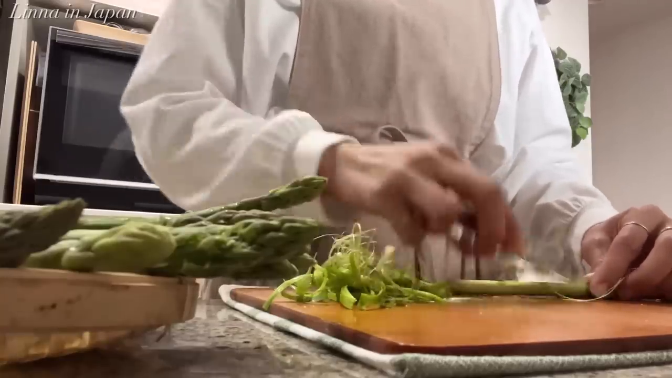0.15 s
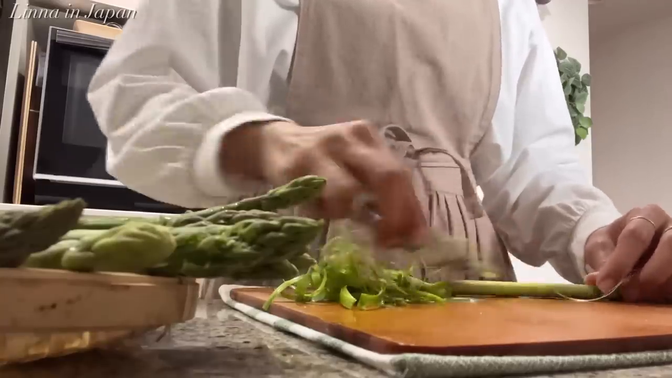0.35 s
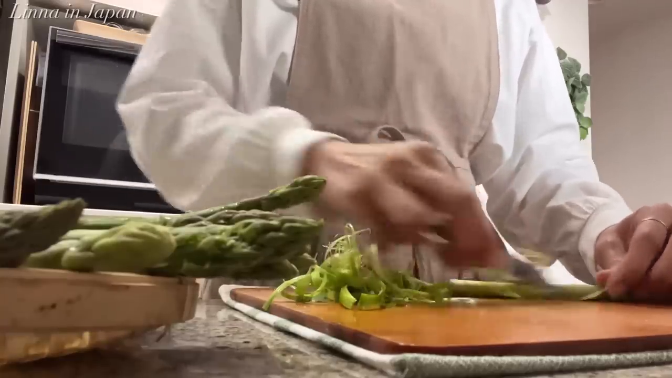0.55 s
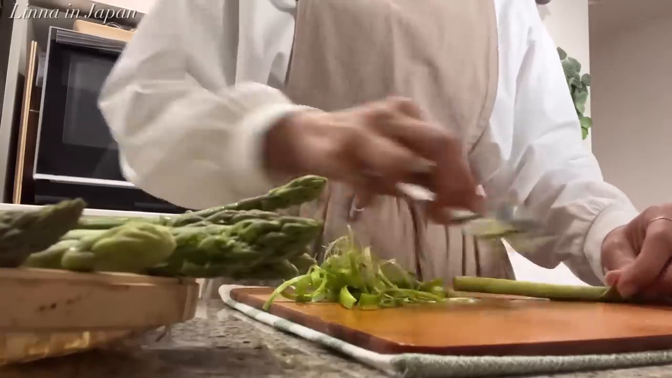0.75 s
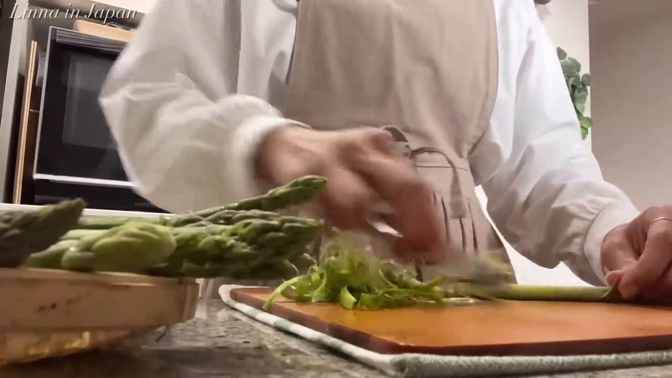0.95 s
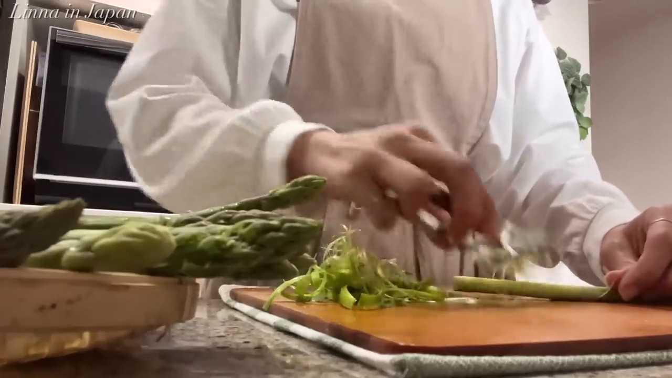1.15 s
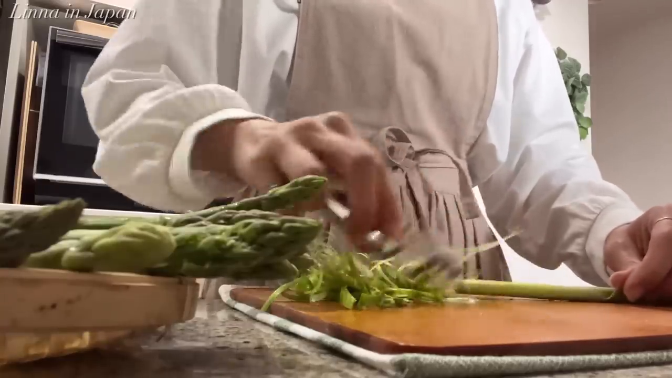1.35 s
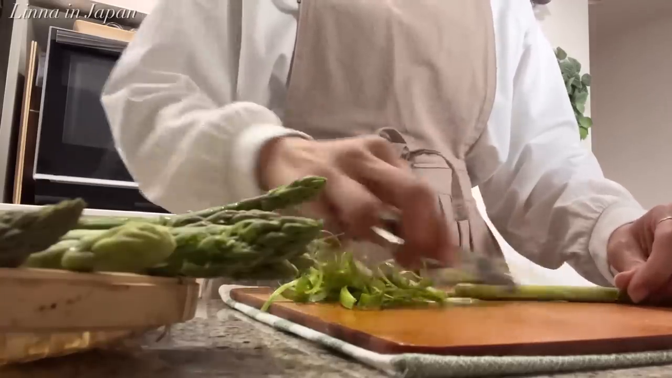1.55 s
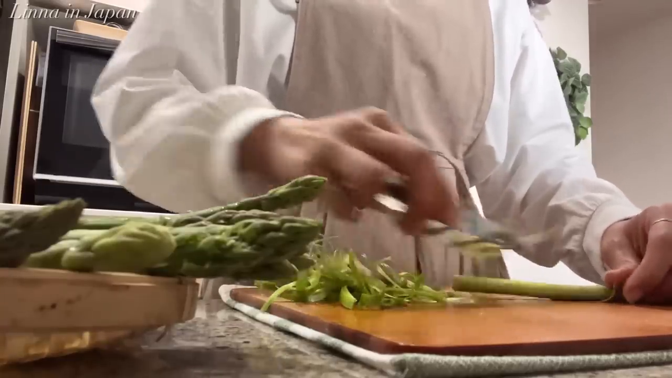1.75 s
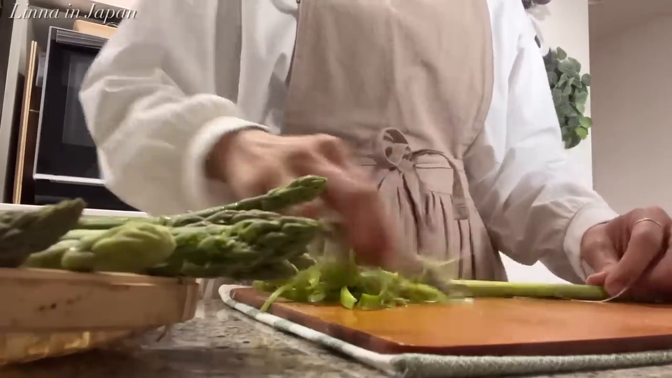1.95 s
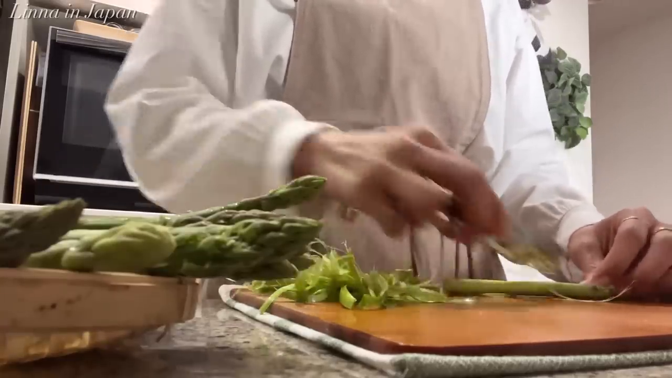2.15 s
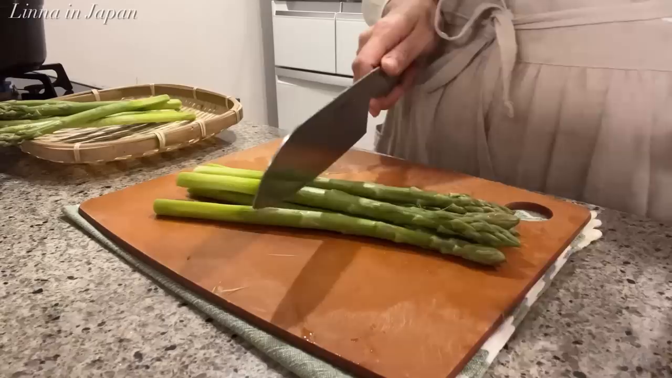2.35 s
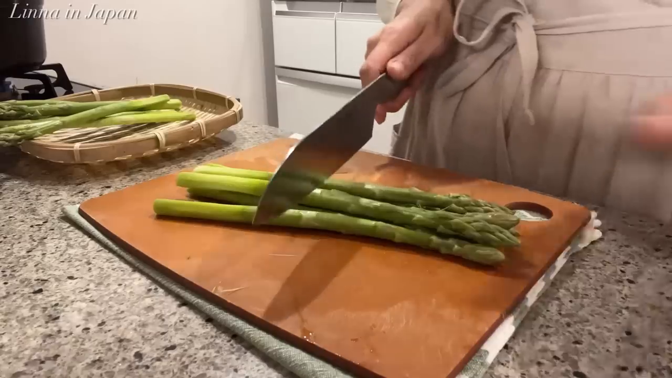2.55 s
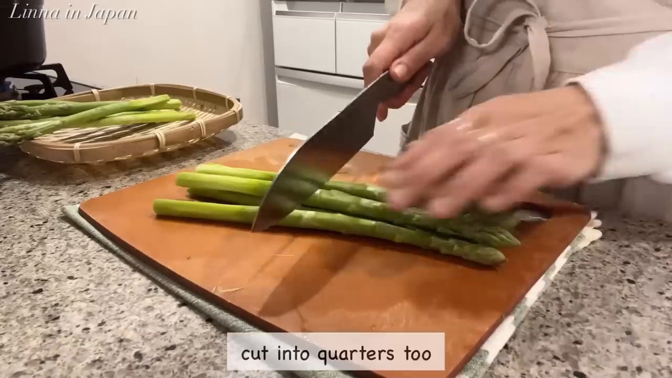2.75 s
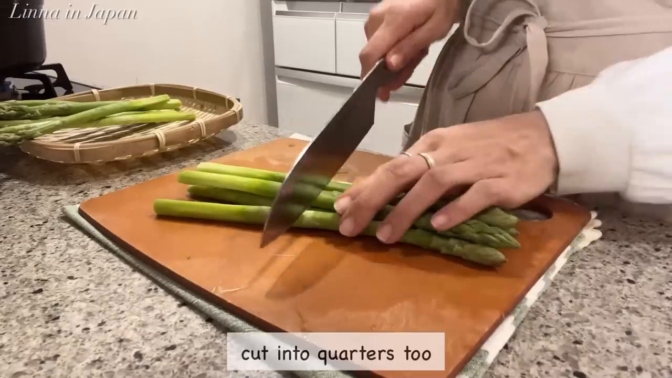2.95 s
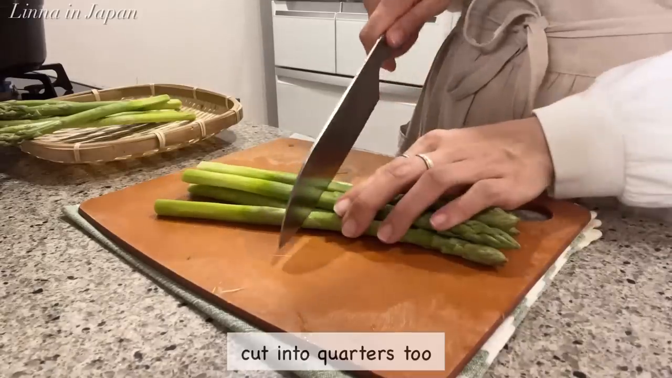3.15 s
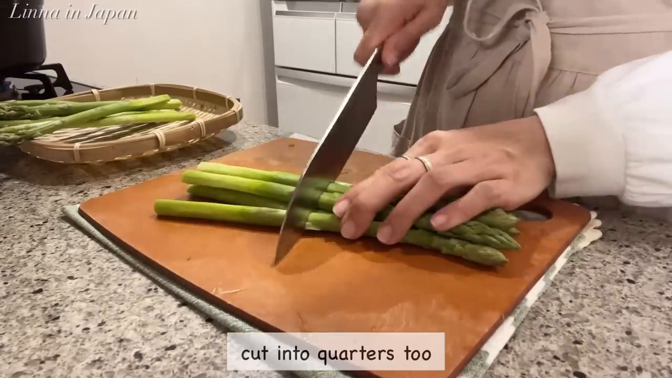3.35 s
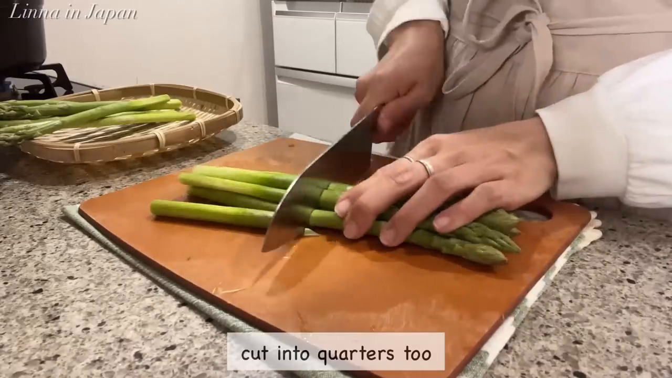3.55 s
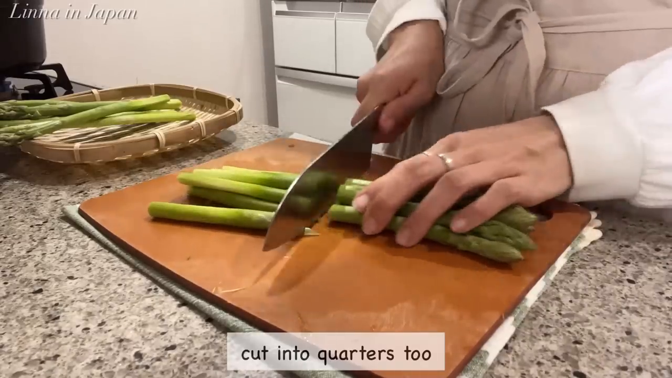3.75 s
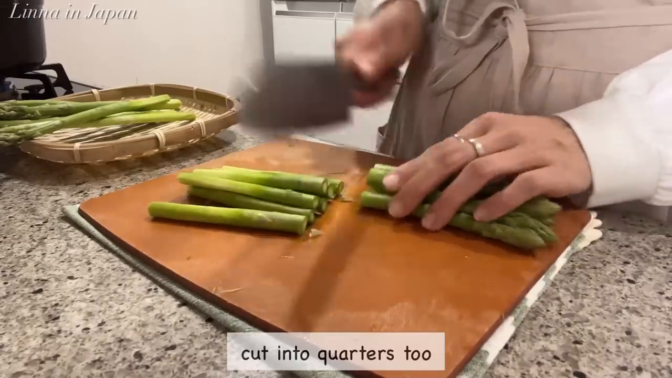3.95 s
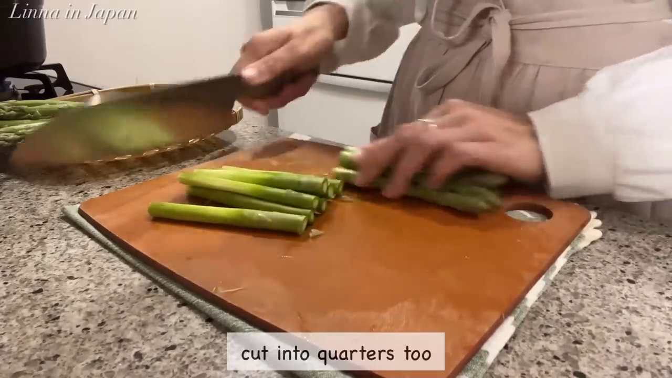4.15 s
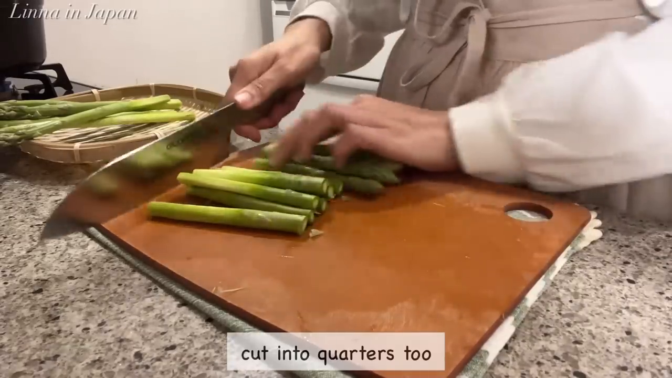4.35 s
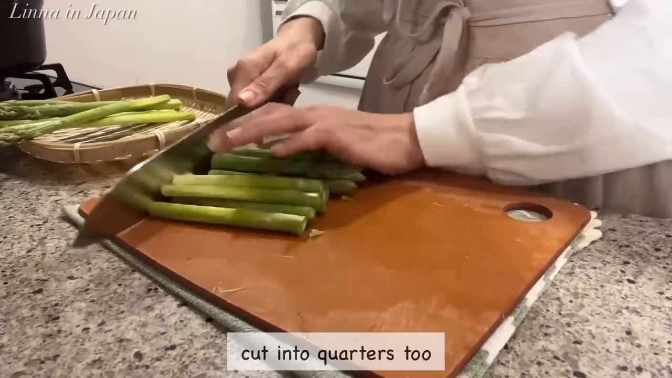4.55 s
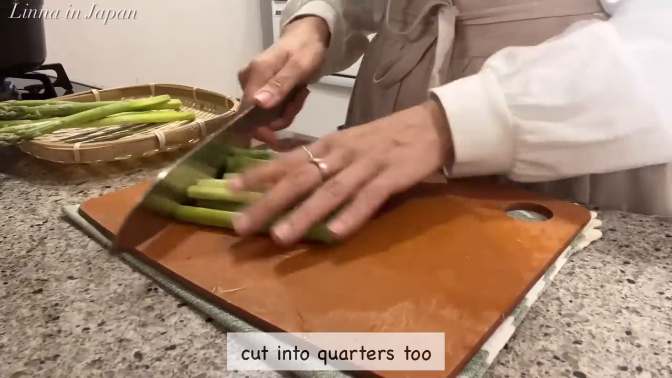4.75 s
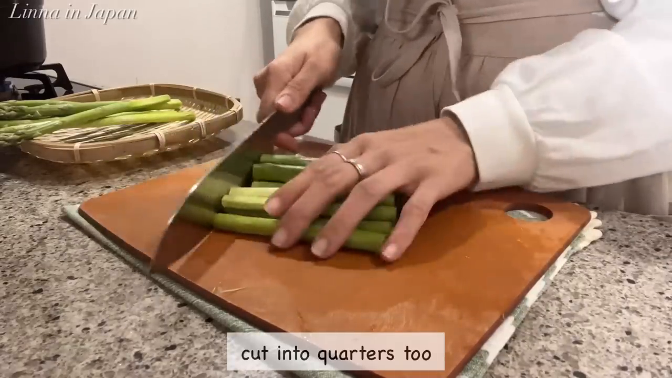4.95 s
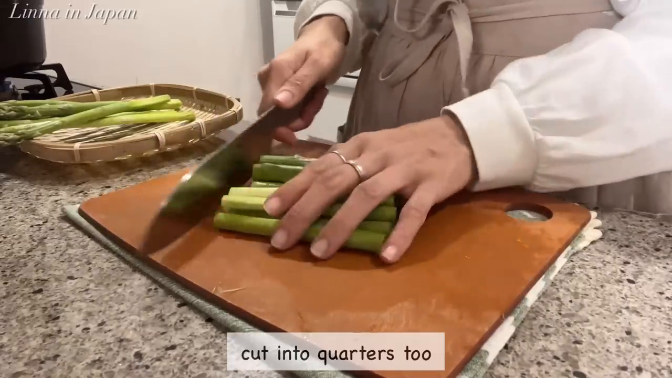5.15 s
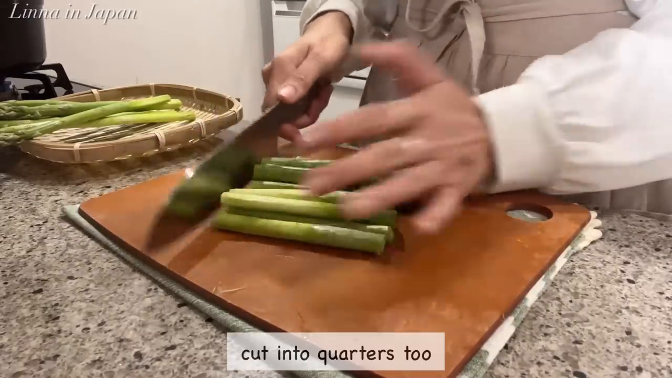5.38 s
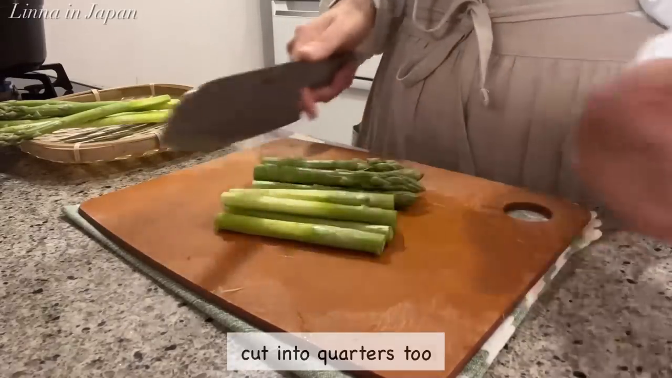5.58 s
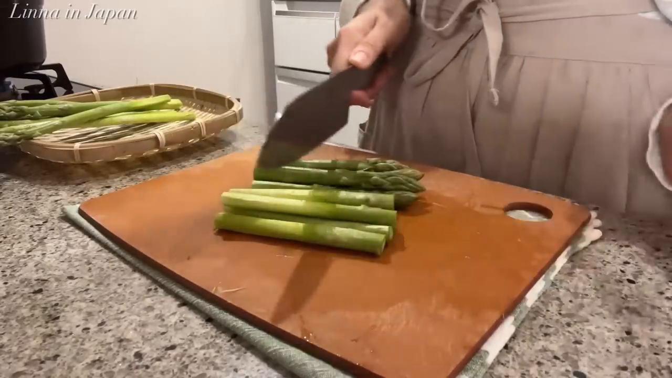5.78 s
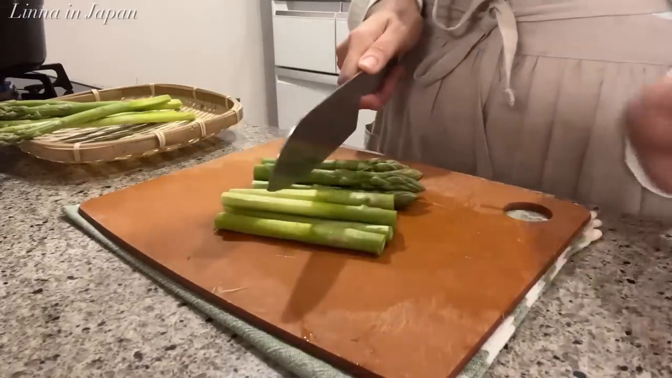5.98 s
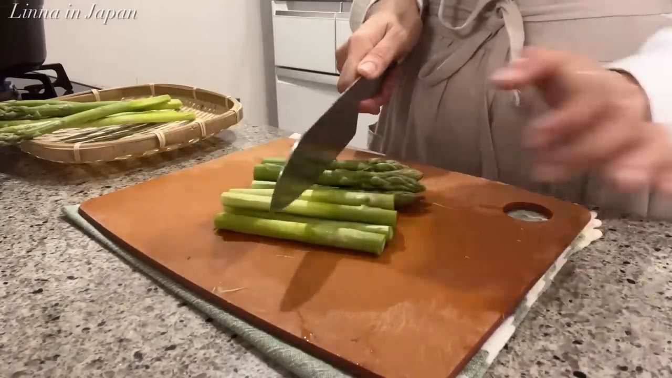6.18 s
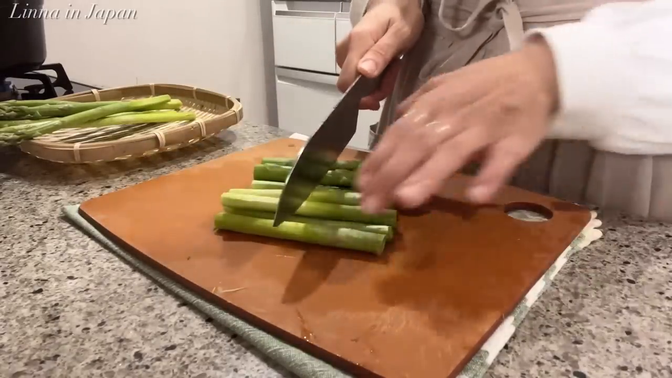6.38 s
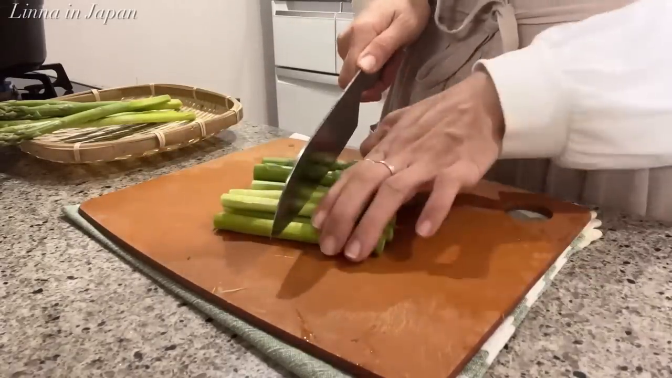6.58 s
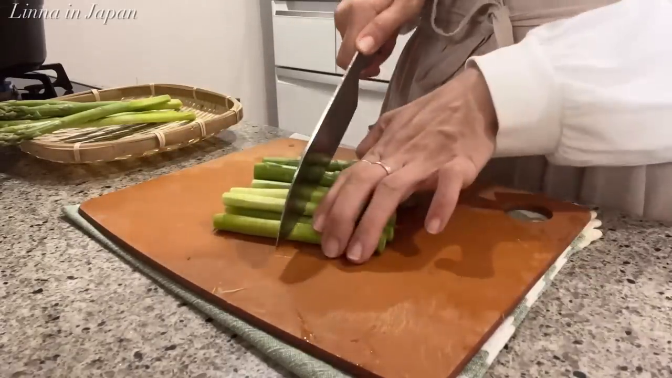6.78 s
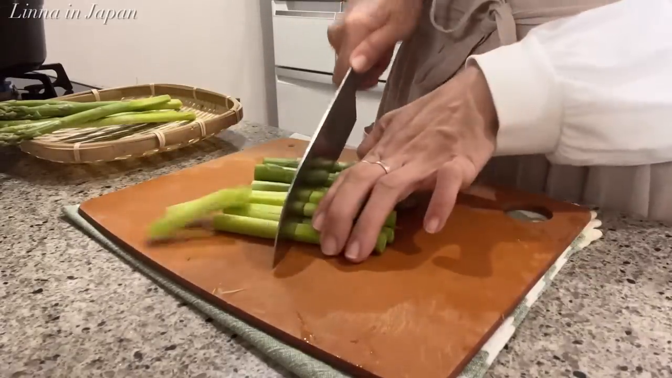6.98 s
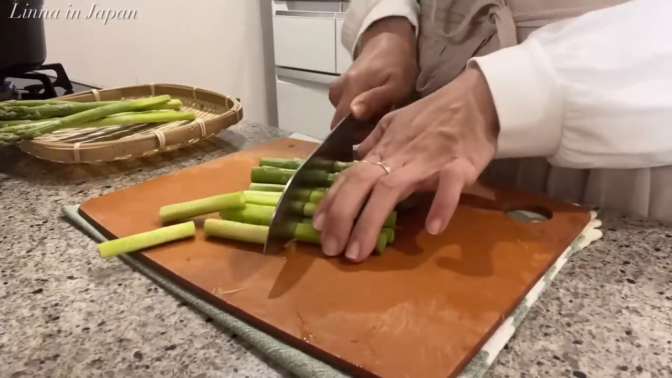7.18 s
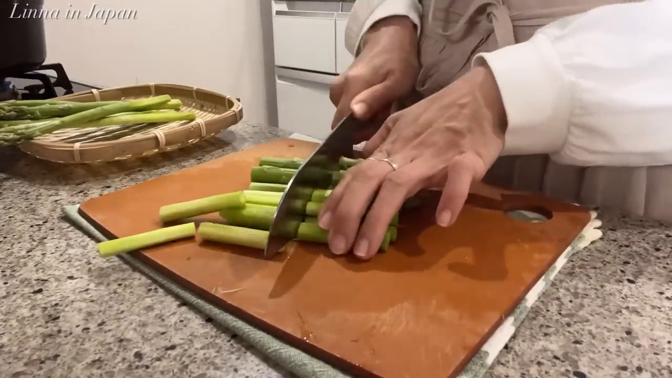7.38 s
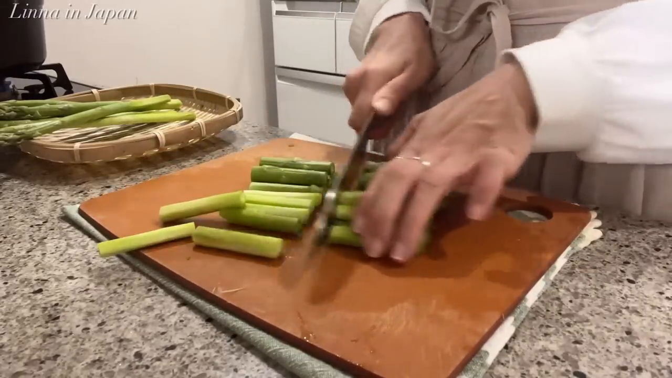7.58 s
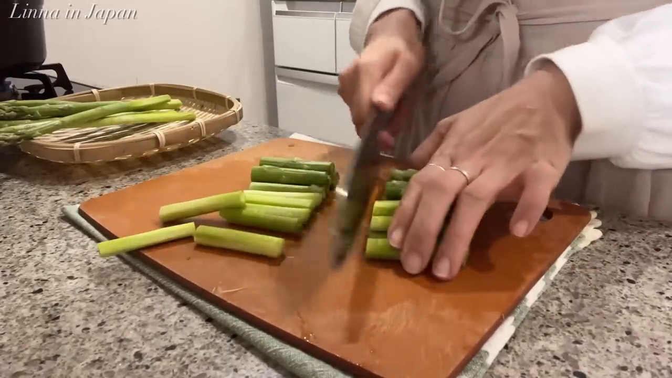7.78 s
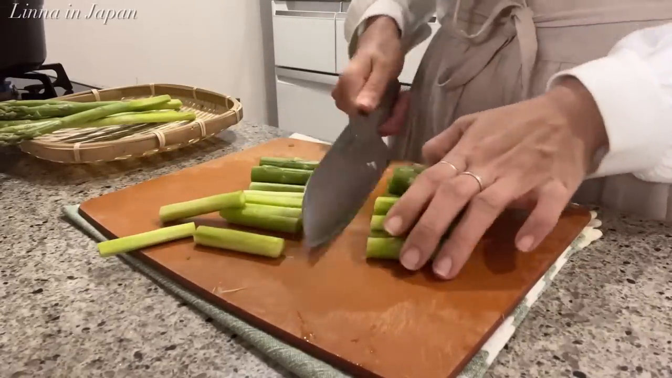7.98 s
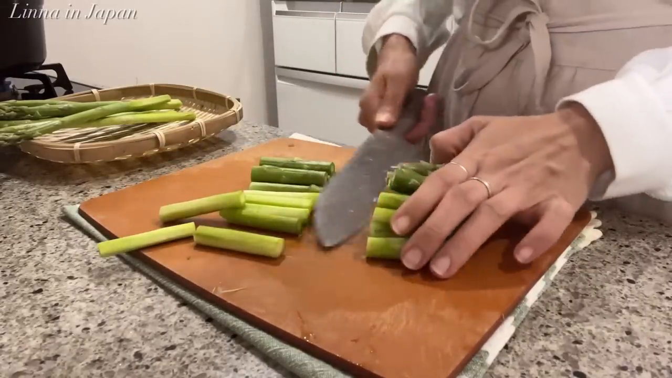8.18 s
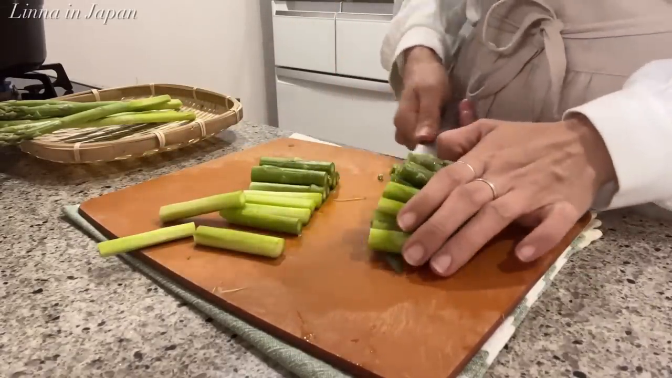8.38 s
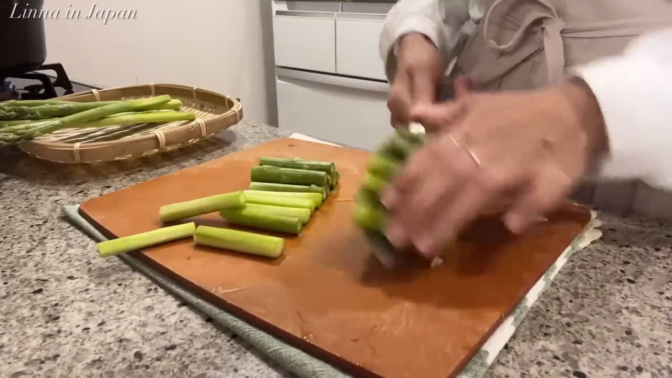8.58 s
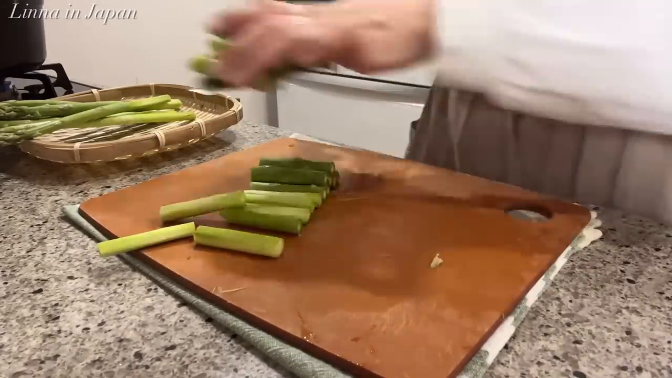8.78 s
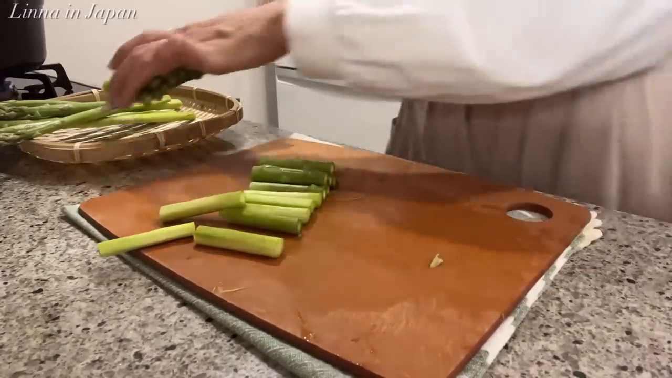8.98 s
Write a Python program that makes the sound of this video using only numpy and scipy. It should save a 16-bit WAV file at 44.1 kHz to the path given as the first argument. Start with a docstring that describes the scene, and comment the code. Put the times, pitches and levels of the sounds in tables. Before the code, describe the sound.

Seven brisk peeler strokes tick and clack on a wooden board, then a knife crunches through stalks, knocks, and scrapes with a thin ring.

```python
"""In a small kitchen, asparagus is peeled and cut on a wooden board, close to the microphone.
A swivel peeler ticks, slides, clacks and chatters: random contacts excite its frame and the board's damped modes.
A steel knife crunches through the stalks as crackling ruptures, knocks on the wood and scrapes with a ringing
blade as slips excite its modes; sliding under the pieces it squeaks. An appliance hums as filtered noise."""
import sys
import numpy as np
from scipy import signal
from scipy.fft import rfft, irfft
from scipy.io import wavfile

SR = 44100
rng = np.random.default_rng(int(sys.argv[2]) if len(sys.argv) > 2 else 0)


def transcribe(u):
    """Save the signal u as a 16-bit wav file named by the first command-line argument.

    u: samples, shape (n,) or (channels, n), limited to [-1, 1]; the rate is SR.
    q: integer samples, one column per channel.
    """
    v = np.clip(np.atleast_2d(u).T, -1, 1)
    q = np.round(v * 32767).astype(np.int16)
    wavfile.write(sys.argv[1], SR, q)


N = 398223
T = np.arange(N) / SR

# Levels in tables and settings are relative: the sources and the room scale them further.

# appliance hum, air hiss and rustle of sleeves and stalks, as spectra: (frequency [Hz], level [dB])
HUM = [(18, -78.5), (30, -47.5), (87, -7.5), (223, -7.5), (260, -1), (303, -5), (595, -15.5), (642, -24.5),
       (680, -18), (874, -23), (1470, -22), (3000, -44.5), (3900, -81.5), (6600, -120)]
AIR = [(2000, -5.5), (3500, -2.5), (7000, -8.5), (10000, -8), (16000, -23.5)]
CLOTH = [(1000, -15.5), (2800, -8.5), (3900, -2), (4800, -5.5), (6200, -1), (8500, -8), (10000, -10),
         (12000, -18.5), (16000, -21)]
# appliance tones: (frequency [Hz], width [Hz], level [dB])
DRONE = [(100.2, 8, -71), (271.9, 38, -58)]
# a hand moves, sleeves brush and stalks are pushed about: (middle [s], half width at 1/e [s], level [dB])
HAND_MOVES = [(3.0, 0.131, -66), (3.777, 0.15, -64.5), (4.252, 0.29, -55.5), (4.78, 0.15, -58),
              (6.553, .13, -64), (6.947, 0.36, -65.5), (7.46, 0.12, -67.5), (8.88, 0.22, -68.5)]
# fingers nudge the stalks and they tick together: (time [s], peak level [dB], colour [Hz])
NUDGES = [(2.555, -49.5, 5500), (3.605, -35.5, 8000), (3.842, -41, 9000), (6.545, -35.5, 4870),
          (7.353, -33.5, 6500)]
# bounces off board, counter, apron and wall: (delay [s], level [dB])
BOUNCES = [(.0013, -17.5), (.0029, -19.5), (.0071, -20), (0.0219, -23)]

# the flat of the blade slides under the pieces: (start [s], full [s], release [s], end [s])
SCOOP = (8.04, 8.15, 8.39, 8.53)
# wet stalk squeaks on steel: (time [s], pitch [Hz], level [dB])
SQUEAK = [(8.2, 3925, -48), (8.28, 3240, -51), (8.31, 3280, -43), (8.34, 4480, -48), (8.385, 4630, -42),
          (8.42, 4330, -75)]
# several stalks squeak at once: (pitch relative to the loudest [ratio], level [dB])
SQUEAKERS = [(1, 0.5), (.78, -3.5), (1.23, -7), (1.62, -11)]
# the edge scrapes across the board: (start [s], full [s], release [s], end [s], level [dB])
SCRAPES = [(4.415, 4.535, 4.5, 4.56, -32), (4.584, 4.688, 4.737, 4.76, -31), (4.73, 4.775, 4.81, 4.94, -55),
           (5.097, 5.135, 5.19, 5.21, -34.5), (7.496, 7.524, 7.68, 7.705, -31)]
# knife blade modes: (frequency [Hz], level [dB])
BLADE = [(2223, -46.5), (2740, -57), (3365, -54), (3930, -52), (5130, -51.5), (5529, -53), (5771, -61),
         (6078, -54.5), (7058, -54.5), (8118, -56.5), (9238, -57), (10406, -61), (11079, -65.5),
         (11660, -72), (12721, -66), (13157, -68)]
# blade modes damped against the board: (frequency [Hz], width [Hz], level [dB])
FLAT_BLADE = [(900, 56, 9), (1430, 400, -6), (2420, 250, -7), (3280, 120, 4.5), (4500, 90, 2),
              (5600, 80, -14)]
# edge on the grain and flat blade on the wood, as spectra: (frequency [Hz], level [dB])
GRIT = [(150, -8.5), (300, 8), (850, -4.5), (1500, -5), (2900, -7), (5500, -1.5), (8500, -16),
        (11000, -19.5), (16000, -23)]
SLIDE = [(200, -8.5), (400, -1.5), (950, 0.5), (2000, -11), (4500, -4.5), (7500, -8), (11000, -20),
         (16000, -37)]

# peeler strokes: (bite [s], end [s], slide level [dB], bite tick level [dB], stalk thud level [dB],
# thud brightness [Hz], end tick level [dB])
PEELS = [(0.172, 0.3446, -51, -12, -10, 905, -21.5), (0.5172, 0.6434, -51.5, -9.5, -22.5, 940, -20.5),
         (0.8547, 0.9854, -48, -22.5, -19.5, 900, -22), (1.182, 1.33, -53.5, -19.5, -27.5, 710, -28),
         (1.5125, 1.5868, -48.5, -11, -22.5, 700, -21.5), (1.8226, 1.9295, -50, -18, -25, 690, -16),
         (2.2088, 2.3331, -51, -16, -15, 700, -15.5)]
# the peeler's frame hits the board: (time [s], peak level [dB], colour [Hz], wood knock level [dB],
# knock brightness [Hz])
CLACKS = [(0.9854, -4.5, 1740, -13, 2630), (1.1917, -4.5, 4500, -14.5, 900), (1.49, -7.5, 1947, -9, 900),
          (1.5975, -11, 2170, -17, 2180), (1.9441, -0.5, 2240, -15, 2320)]
# the peeler chatters across the wood: (start [s], end [s], level [dB])
CHATTERS = [(-0.01, 0.061, -48), (1.271, 1.32, -28), (1.594, 1.638, -28.5), (1.957, 1.978, -28)]
# peeler frame resonances: (frequency [Hz], width [Hz], level [dB])
PEELER = [(1250, 44, -8.5), (1411, 19, -7.5), (1740, 34, -7), (2203, 110, 3.5), (2755, 43, -2.5),
          (2980, 17, -25.5), (3400, 300, -12.5), (3683, 19, -10.5), (4433, 190, -16), (4330, 130, -6.5),
          (5080, 32, -17.5), (5454, 50, -20)]
# frame impact, blade tick and blade on skin, as spectra: (frequency [Hz], level [dB])
FRAME = [(300, -20.5), (900, -18.5), (1600, -7.5), (2300, -4), (4600, -2.5), (6200, -11), (7500, -9),
         (10000, -21.5), (16000, -20.5)]
TICK = [(400, -6), (1500, -12.5), (2800, -18), (4300, 3), (7000, -0.5), (11000, -5.5), (16000, -12.5)]
SKIN = [(500, -9), (2500, -7), (4400, 0), (7000, -1), (11000, -6), (16000, -17.5)]

# the knife works through the stalks: (start [s], full [s], release [s], end [s], level [dB])
CUTS = [(3.088, 3.203, 3.23, 3.24, -46.5), (3.277, 3.374, 3.486, 3.595, -40),
        (6.647, 6.732, 6.73, 6.78, -46), (6.817, 6.875, 6.875, 6.89, -27), (6.927, 7.042, 7.1, 7.15, -34)]
# the toughest fibres snap under the knife: (time [s], peak level [dB], colour [Hz])
SNAPS = [(3.345, -17.5, 7100), (3.3595, -12, 4500), (3.384, -14, 7100), (3.3895, -14, 6160),
         (3.4204, -6, 6550), (3.462, -17, 6380), (3.472, -20.5, 6000), (6.716, -27, 7000),
         (6.8584, -14.5, 2990), (6.868, -7.5, 7100), (6.9662, -19.5, 6300), (7.0637, -17.5, 4500)]
# bursting stalk, as a spectrum: (frequency [Hz], level [dB])
CRUNCH = [(200, -8), (400, 3.5), (900, -1.5), (2000, -7.5), (3500, -3.5), (6000, -2), (9000, -6),
          (12000, -14), (16000, -14)]

# the knife lands on the board: (time [s], peak level [dB], brightness [Hz], higher for a harder contact,
# boom [dB], ring of the struck spot [Hz])
KNOCKS = [(3.2338, -13, 2200, 10.5, 770), (4.356, -17.5, 1900, 8.5, 1400), (5.1067, -3.5, 2205, 3.5, 1460),
          (6.507, -26, 1602, 5, 1200), (6.857, -23, 686, 14, 490), (6.8738, -2.5, 3260, 2.5, 790),
          (7.9783, -2.5, 1520, -1, 1100)]
# board modes: (frequency [Hz], T60 [s], level [dB])
BOARD = [(159.5, 0.094, -22.5), (305, 0.069, -8), (473, 0.074, -4.5), (604.4, 0.057, -3), (726, .025, -1.5),
         (843, 0.023, 0.5), (1100, .015, -4), (1380, 0.021, -2.5), (1579, 0.004, -5), (2360, 0.026, -8.5),
         (2840, 0.013, -4.5), (4570, .02, -22)]
# diffuse shudder of board and counter, as a spectrum: (frequency [Hz], level [dB])
WOOD = [(80, -21), (160, -10), (300, -6), (700, -2), (1300, 2.5), (2000, -3.5), (4500, -7.5), (8000, -21.5),
        (16000, -28.5)]

HUM_DB = -51  # middle of its slow wandering
NUDGE_T60_S = 0.046
SCOOP_WOOD_DB, WOOD_SAG_DB_PER_S = -33.5, 53  # the board's rasp fades as the pieces ride up on the steel
SCOOP_STEEL_DB, STEEL_SAG_DB_PER_S = -37.5, 23.5
CATCH_PER_S, CATCH_SPREAD_DB, CATCH_DB = 16, 8, -6  # the edge catches and single blade modes sing out
CATCH_LOWEST_HZ = 2100  # the lower modes sing less readily
FLIP_LEAD_S, FLIP_DB = .027, -29  # the swivel blade flips over just before it bites
TOUCH_LEAD_S, TOUCH_DB = .009, -13  # it touches the skin lightly, then digs in; level relative to the bite
RATTLE_PER_S, RATTLE_DB, RATTLE_SPREAD_DB = 6, -35.5, 1.5  # and rattles loosely in its frame
TICK_T60_S, THUD_BOOM_DB, CLACK_BOOM_DB = .04, 7, 7
EXIT_KNOCK_DB, EXIT_KNOCK_HZ = -14.5, 1900  # leaving the stalk it taps the board; relative to its tick
FIBRES_PER_S, FIBRE_DB, FIBRE_SPREAD_DB, FIBRE_HZ = 25, 9, 5, 6000  # lesser fibres; relative to the cut
WORK_DROPS_OUT_S = 2.378  # the peeling sound and its echo drop out at once, leaving only the background
TOP_HZ = 16000


def undb(db):
    """Decibels are a logarithm of amplitude; return the gain."""
    return np.exp(np.asarray(db) * (np.log(10) / 20))


def unit(x):
    """Dividing by the rms value normalizes the signal to rms 1."""
    return x / np.sqrt(np.mean(x ** 2))


def curve(rows, column=1):
    """Envelope: gain interpolated linearly in decibels, silent outside the rows."""
    rows = np.array(rows)
    return undb(np.interp(T, rows[:, 0], rows[:, column], left=-150, right=-150))


def band(x, hz, kind, order=2):
    """Butterworth filtering: a maximally flat passband."""
    return signal.sosfilt(signal.butter(order, np.minimum(hz, SR / 2 - 1), kind, fs=SR, output="sos"), x)


def ring(x, hz, width_hz):
    """Simple resonance: one damped mode with gain 1 at its centre."""
    return signal.lfilter(*signal.iirpeak(min(hz, SR / 2 - 1), hz / width_hz, fs=SR), x)


def colour(x, points, size=4096):
    """Minimum-phase filtering: the folded cepstrum gives a causal filter through (Hz, dB) points."""
    hz, db = np.transpose(points)
    gain = undb(np.interp(np.log(np.fft.rfftfreq(size, 1 / SR) + 1), np.log(hz), db))
    cepstrum = irfft(np.log(gain))[:size // 2]
    cepstrum[1:] *= 2
    response = irfft(np.exp(rfft(cepstrum, size)))
    return signal.oaconvolve(x, response)[:len(x)]


def fade(t, t60):
    """Exponential decay: the level falls 60 dB in t60 seconds."""
    return np.exp(-np.log(1000) * t / t60)


def walk(rate):
    """Random modulation: normal draws, rate per second, joined by straight lines."""
    count = int(10 * rate) + 2
    return np.interp(T * rate, np.arange(count), rng.standard_normal(count))


def grains(rate, spread_db):
    """Stick-slip friction: random micro-slips of uneven size."""
    chance = rng.random(N, dtype=np.float32) * SR / rate
    slip = np.flatnonzero(chance < 1)
    # big slips are exponentially rarer than small ones
    rarity = np.minimum(-np.log(chance[slip] + 1e-9), 4)
    out = np.zeros(N)
    out[slip] = undb(spread_db * rarity) * rng.standard_normal(N, dtype=np.float32)[slip]
    return unit(out)


def crackle(rate, spread_db, cluster_db):
    """Fracture noise: tiny ruptures in pitch ranges whose levels vary independently."""
    edges_hz = [150, 1800, 4200, 7000, 10500, 17000]
    out = 0
    for low, high in zip(edges_hz, edges_hz[1:]):
        ruptures = grains(rate, spread_db) * undb(cluster_db * walk(130))
        out = out + band(ruptures, [low, high], "band")
    return out


def burst(t, t60):
    """Repeated impact: a train of contacts of random sign that dies away."""
    return rng.choice([-1, 1], len(t)) * fade(t, t60)


def scatter(start, end, rate, db, spread_db):
    """Jittered point process: small events at loosely even times, as rows (time [s], level [dB])."""
    chance = rng.random((max(round((end - start) * rate), 1), 2))
    return [(start + (end - start) * (k + when) / len(chance), db + spread_db * (2 * size - 1))
            for k, (when, size) in enumerate(chance)]


def add(out, s, x, gain):
    """Superposition: mix a sound in at a time."""
    i = max(int(s * SR), 0)
    out[i:i + len(x)] += gain * x[:N - i]


def add_peak(out, s, x, db):
    """Superposition of a sound scaled to a peak level."""
    add(out, s, x / np.abs(x).max(), undb(db))


def stroke(start, full, release, end, db):
    """Force envelope of a hand stroke: it builds, holds and lets go; the four times are sorted."""
    return undb(db) * np.interp(T, np.sort([start, full, release, end]), [0, 1, 1, 0]) ** 1.96


def skid(start, end, db):
    """Contact envelope: it comes and goes quickly."""
    return undb(db) * np.interp(T, [start, start + 0.0029, end - .008, end], [0, 1, 1, 0])


def shimmer(x, t60):
    """Modal density: a crowd of weak, damped modes of a thin steel plate."""
    t = T[:SR // 10]
    chance = rng.random((90, 3))
    place = (np.arange(len(chance)) + chance[:, 0]) / len(chance)
    hz = 700 + 15000 * place ** 1.4
    # each angle is in radians; with the factor 2 pi the modes sound at hz
    waves = np.sin(2 * np.pi * (hz[:, None] * t + chance[:, 2:]))
    modes = (chance[:, 1] + .5) @ waves * fade(t, t60)
    return signal.oaconvolve(x, modes / np.linalg.norm(modes))[:N]


def background():
    """Filtered noise: appliance hum and tones, thin air hiss, rustle of sleeves and stalks."""
    hum = undb(HUM_DB + 0.75 * walk(4.2)) * unit(colour(rng.standard_normal(N), HUM))
    drone = 0
    for hz, width, db in DRONE:
        tone = ring(ring(rng.standard_normal(N), hz, width), hz, width)
        drone = drone + undb(db) * unit(tone)
    air = undb(-74.5) * unit(colour(rng.standard_normal(N), AIR))
    speed = sum(undb(db) * np.exp(-((T - s) / half) ** 2) for s, half, db in HAND_MOVES)
    rustle = speed * undb(0.5 + 1.3 * walk(24)) * unit(colour(grains(13000, 1.6), CLOTH))
    # the peeling hand jostles the board
    rumble = unit(band(rng.standard_normal(N), [70, 220], "band"))
    jostle = undb(-53 + 2 * walk(9)) * (T < PEELS[-1][1]) * rumble
    return hum + drone + air + rustle + jostle


def kitchen(x, t):
    """Room response: near surfaces reflect discretely, then the walls return a short diffuse tail."""
    tail = rng.standard_normal(len(t)) * fade(t, 0.35) * (1 - fade(t, 0.011))
    wall_spectrum = [(100, -9), (500, -14), (2000, -18), (6000, -15.5), (16000, -20)]
    room = colour(tail / np.linalg.norm(tail), wall_spectrum)
    for s, db in BOUNCES:
        room[int(s * SR)] += undb(db)
    return undb(-0.6) * (x + signal.oaconvolve(x, room)[:N])


def nudging(t):
    """Multiple impact: loose stalks knock and rub together in a short, soft rattle."""
    out = np.zeros(N)
    for s, db, hz in NUDGES:
        contacts = burst(t, NUDGE_T60_S) * rng.random(len(t)) ** 3
        add_peak(out, s, ring(contacts, hz, hz), db)
    return out


def squeak():
    """Stick-slip oscillation: uneven tones share one gliding pitch as several stalks squeak at once."""
    s, hz, _ = np.transpose(SQUEAK)
    out = 0
    for ratio, db in SQUEAKERS:
        jitter = 1 + .025 * walk(900) + .02 * walk(30)
        phase = 2 * np.pi * np.cumsum(ratio * np.interp(T, s, hz) * jitter) / SR
        out = out + undb(db + 3 * walk(80)) * np.sin(phase)
    return curve(SQUEAK, column=2) * out


def scooping():
    """Contact damping: lying flat, the blade rubs with a duller, damped ring."""
    slips = grains(5000, 2.5) * undb(0.45 * walk(70))
    modes = sum(undb(db) * ring(slips, hz, width) for hz, width, db in FLAT_BLADE)
    rub = unit(colour(slips + shimmer(slips, 0.031), SLIDE)) + undb(-4.0) * unit(modes)
    wood = unit(band(rub, 3600, "low"))
    steel = unit(band(rub, 2000, "high"))
    sliding_s = np.maximum(T - SCOOP[1], 0)
    wood_force = stroke(*SCOOP, SCOOP_WOOD_DB - WOOD_SAG_DB_PER_S * sliding_s)
    steel_force = stroke(*SCOOP, SCOOP_STEEL_DB - STEEL_SAG_DB_PER_S * sliding_s)
    return wood * wood_force + steel * steel_force + squeak()


def scraping():
    """Friction-driven modes: the edge catches on the grain and the blade's modes swell and fade."""
    force = sum(stroke(*scrape) for scrape in SCRAPES)
    slips = force * grains(9000, 1.8)
    grit = colour(undb(-7) * slips + shimmer(slips, 0.05), GRIT)
    # steel and song: every mode gets its own wandering drive; the narrow modes of the song ring longer
    steel = sum(undb(db) * ring(slips * undb(2 * walk(30)), hz, 49) for hz, db in BLADE)
    song = 0
    for hz, db in BLADE:
        catch = undb(CATCH_SPREAD_DB * np.tanh(walk(CATCH_PER_S)))
        song = song + undb(db) * ring(slips * catch, hz, 19.5)
    song = unit(band(song, CATCH_LOWEST_HZ, "high"))
    return np.std(slips) * (undb(-2) * unit(grit) + undb(-10) * unit(steel) + undb(CATCH_DB) * song)


def swivel(t):
    """Impact of a loose joint: the blade ticks as it flips, bites and leaves, and rattles throughout."""
    out, ticks = np.zeros(N), []
    for bite, end, _, bite_db, _, _, end_db in PEELS:
        ticks += [(bite - FLIP_LEAD_S, FLIP_DB), (bite - TOUCH_LEAD_S, bite_db + TOUCH_DB)]
        ticks += [(bite, bite_db), (end, end_db)]
    rattles = scatter(PEELS[0][0], PEELS[-1][1], RATTLE_PER_S, RATTLE_DB, RATTLE_SPREAD_DB)
    for s, db in ticks + rattles:
        contact = burst(t, TICK_T60_S) * (1 + 1.2 * fade(t, .008))
        add_peak(out, s, colour(contact, TICK), db - 3.5)
    return out


def peeler_body(x):
    """Modal superposition: the resonances of the peeler's frame."""
    return unit(sum(undb(db) * ring(x, hz, width) for hz, width, db in PEELER))


def peeler(t):
    """Friction and impact: the blade hisses along the skin, and the frame clacks down and skids."""
    slide = sum(skid(bite, end + 0.018, db) for bite, end, db, *_ in PEELS)
    slide = slide + skid(0, PEELS[-1][1] + 0.043, -64)  # faint contact through all the strokes
    out = slide * undb(-7.0 + 2 * walk(23)) * unit(colour(crackle(3000, 3.1, 1.5), SKIN))
    for s, db, hz, *_ in CLACKS:
        contact = burst(t, .015)
        clack = unit(colour(contact, FRAME)) + undb(-5.5) * peeler_body(contact)
        add_peak(out, s, band(clack, 2.2 * hz, "low", order=1), db + 0.4)
    # the skidding frame hops in many tiny, soft bounces
    hops = sum(skid(*row) for row in CHATTERS) * grains(9000, 1.2)
    steel = unit(ring(shimmer(hops, 0.036), 2200, 1900))
    rasp = peeler_body(hops) + undb(-2.0) * steel + undb(-8.0) * unit(colour(hops, WOOD))
    return out + undb(-1.5) * np.std(hops) * band(rasp, 6800, "low")


def cutting(t):
    """Fracture: cells burst in a dense, clustered crackle; single tough fibres snap."""
    force = sum(stroke(*cut) for cut in CUTS)
    out = force * undb(-0.5 + 2.5 * walk(90)) * unit(colour(crackle(2200, 3.9, 2.3), CRUNCH))
    fibres = []
    for _, full, release, _, cut_db in CUTS:
        lesser = scatter(full, release, FIBRES_PER_S, cut_db + FIBRE_DB, FIBRE_SPREAD_DB)
        fibres += [(s, db, FIBRE_HZ) for s, db in lesser]
    for s, db, hz in list(SNAPS) + fibres:
        # one sharp break, then a few smaller tears
        crack = (t == 0) + undb(-6.0) * burst(t, 0.0031) + undb(-25.5) * burst(t, 0.03)
        snap = unit(ring(ring(crack, hz, 2890), hz, 2880)) + undb(-2) * unit(colour(crack, CRUNCH))
        add_peak(out, s, snap, db + 1.7)
    return out


def board_modes(t):
    """Modal superposition: damped sines of alternating sign make up the board's ring."""
    out = 0
    for k, (hz, t60, db) in enumerate(BOARD):
        out = out + (-1) ** k * undb(db) * np.sin(2 * np.pi * hz * t) * fade(t, t60)
    return unit(out)


def knocks(t):
    """Impact excitation: blows ring the board's modes and a diffuse shudder; soft ones lose the treble."""
    out = np.zeros(N)
    modes = board_modes(t)
    thuds = [(bite, db, hz, THUD_BOOM_DB) for bite, _, _, _, db, hz, _ in PEELS]
    exits = [(end, db + EXIT_KNOCK_DB, EXIT_KNOCK_HZ, THUD_BOOM_DB) for _, end, *_, db in PEELS]
    clacks = [(s, db, hz, CLACK_BOOM_DB) for s, _, _, db, hz in CLACKS]
    taps = [(s, db, hz, boom_db, .72 * hz) for s, db, hz, boom_db in thuds + exits + clacks]
    for s, db, hz, boom_db, spot_hz in taps + list(KNOCKS):
        blow = modes + undb(0.5) * unit(colour(burst(t, 0.037), WOOD))
        # the push favours modes that match its length; a hard edge adds a sharp click
        push = band(blow, hz, "low", order=4)
        spot = ring(push, spot_hz, 0.37 * spot_hz)
        click = band(blow, 2200, "high") * min(hz / 2000, 1)
        blow = push + undb(0.5) * spot + undb(-8.0) * click
        blow = blow + (undb(boom_db) - 1) * band(blow, 450, "low", order=1)
        add_peak(out, s, blow, db - 1.0)
    return out


def scene():
    """Superposition of peeler, knife and board in the room, over the background."""
    t = T[:SR // 8]
    work = nudging(t) + scooping() + scraping() + swivel(t) + peeler(t) + cutting(t) + knocks(t)
    # only the background sounds between this sudden drop-out and the first nudge
    busy = (T < WORK_DROPS_OUT_S) | (T > NUDGES[0][0] - .01)
    return (background() + kitchen(work, T[:SR // 2]) * busy)[None]


def record(dry):
    """Band limitation: the microphone loses the deep bass and the very top."""
    without_bass = band(dry, 44, "high", order=5)
    return signal.sosfilt(signal.ellip(8, .2, 70, TOP_HZ, fs=SR, output="sos"), without_bass)


dry = scene()
out = record(dry)
transcribe(out)
```